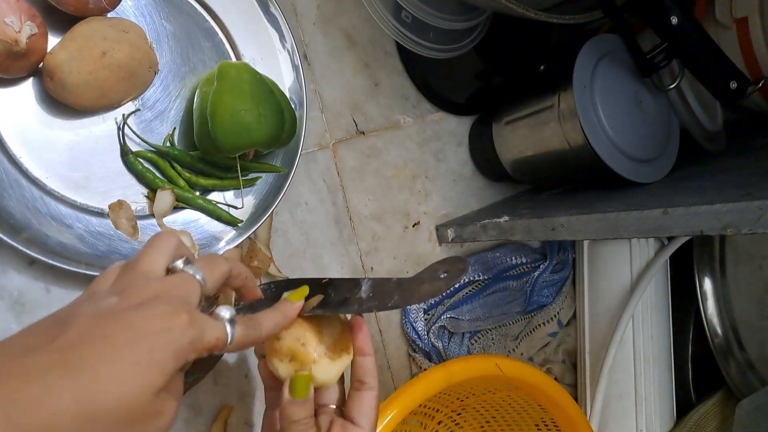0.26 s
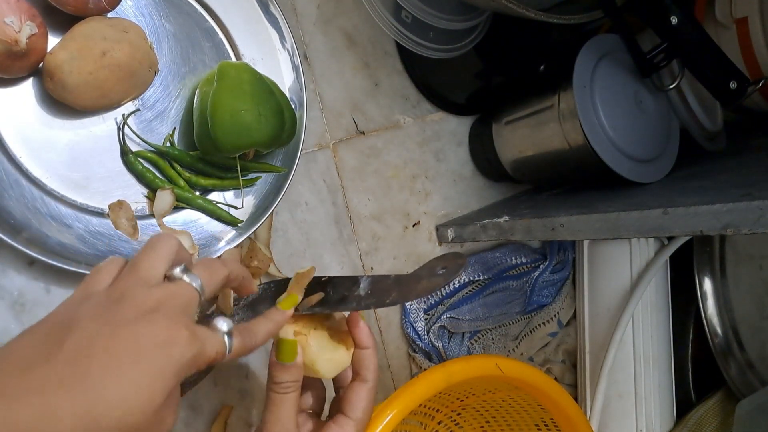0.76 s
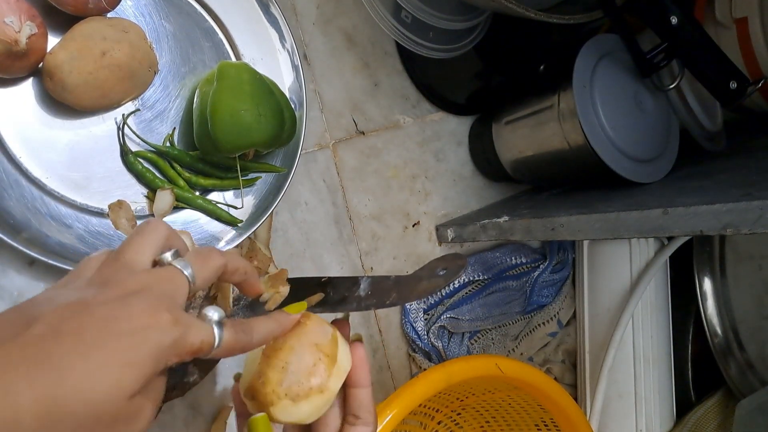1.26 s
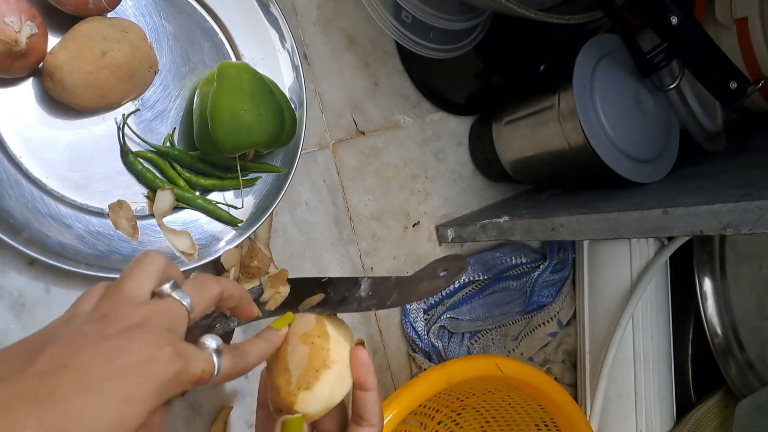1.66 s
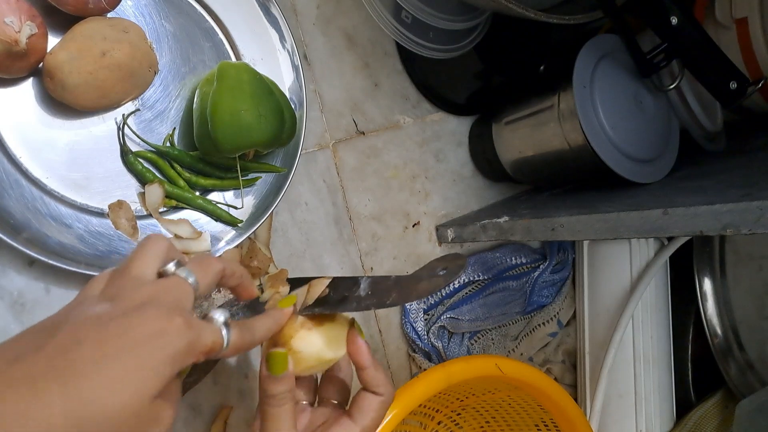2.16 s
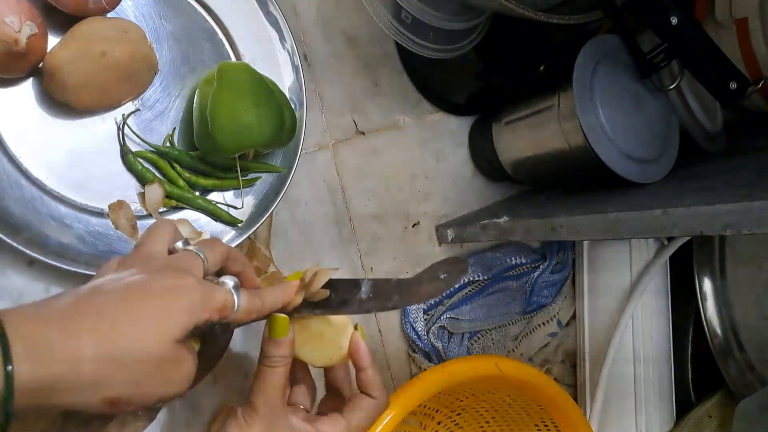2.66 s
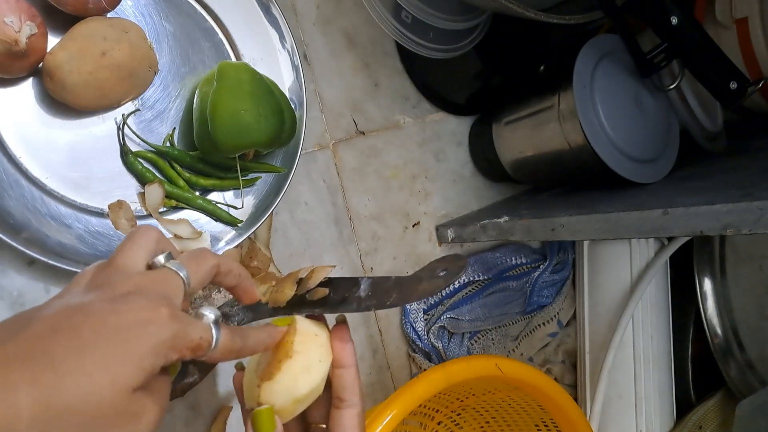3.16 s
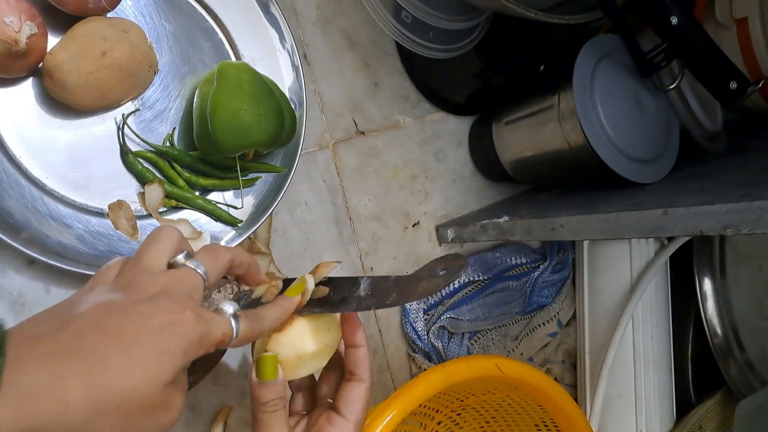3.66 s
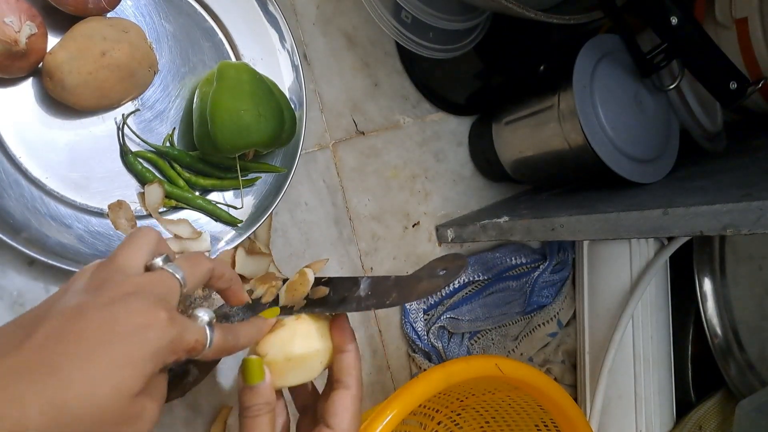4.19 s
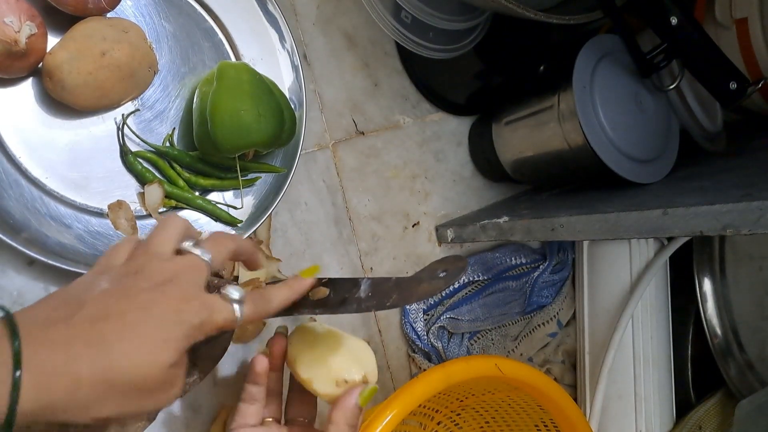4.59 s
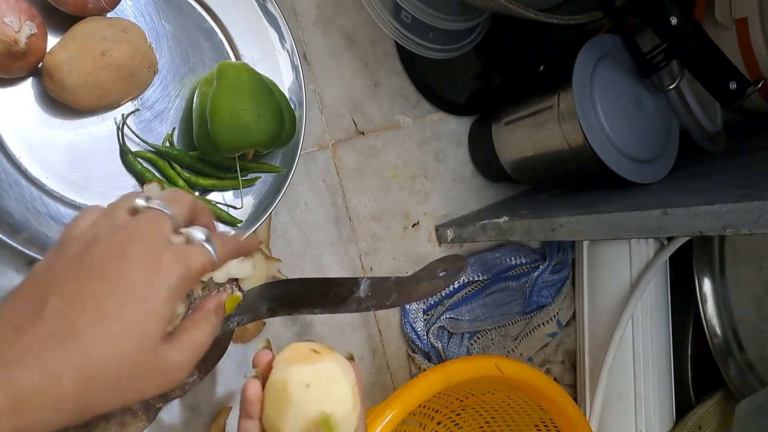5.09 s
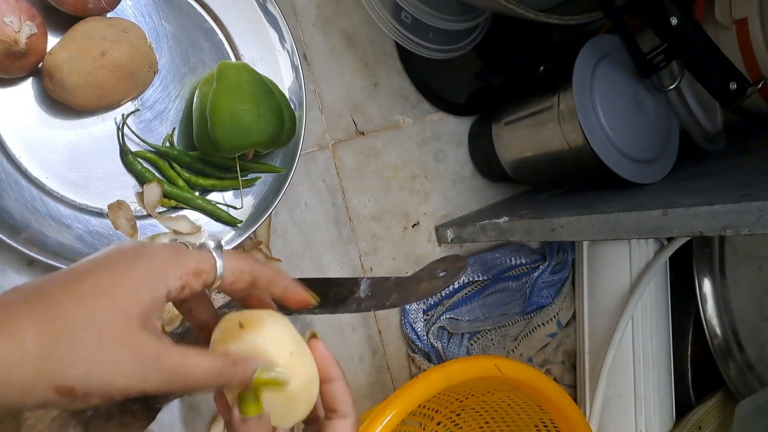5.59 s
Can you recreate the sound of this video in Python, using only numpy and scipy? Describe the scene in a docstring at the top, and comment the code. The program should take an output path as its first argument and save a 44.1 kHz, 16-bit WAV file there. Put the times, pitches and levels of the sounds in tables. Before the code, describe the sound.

Thin metal bangles clink and jingle brightly over short wet rasps as a potato is peeled on a fixed blade in a small tiled kitchen.

```python
"""A potato is pushed in short strokes against a fixed upright blade in a small tiled kitchen.
Peel rasps and bangles clink from the start, hard near 0.9 s, in a dense flurry at 2.0-2.9 s, then sparsely.
Hard clinks return at 3.8-5.1 s, a soft rush peaks at 4.5 s, and the end is faint, over a low wavering hum.
Bangles are noise snaps, noise chatter and decaying modes; the rasp is random bursts through resonances.
The room is decaying noise convolved with the near sounds; the hum is a sine, the rush filtered noise."""
import sys
import numpy as np
from scipy import signal
from scipy.fft import rfft, irfft, next_fast_len
from scipy.io import wavfile
from scipy.ndimage import uniform_filter1d, map_coordinates

SR = 44100
rng = np.random.default_rng(int(sys.argv[2]) if len(sys.argv) > 2 else 0)


def wrap_up_sound(samples):
    """Save the sound to the file named by the first command line argument, as 16-bit audio."""
    columns = np.atleast_2d(samples).T
    # keep every value between -1 and 1, then stretch to whole-number steps
    tamed = np.clip(columns, -1, 1)
    steps = np.round(tamed * 32767).astype(np.int16)
    wavfile.write(sys.argv[1], SR, steps)


N = 257396

# Wrist jolts that throw the bangles together; levels before the trims in scene() and the ring offsets:
# (time [s], snap level [dB], chatter level [dB], chatter length [s], ring level [dB])
JOLTS = [(0.002, -48, -45.5, 0.094, -48), (0.087, -36, -34, .024, -47), (0.163, -26, -37, 0.018, -41),
         (0.208, -33, -42, 0.042, -37), (0.24, -28, -27.5, 0.014, -42), (0.3513, -45, -36.5, 0.036, -41),
         (0.381, -38, -31, 0.014, -46), (0.512, -39, -40.5, .012, -42), (0.601, -44, -52, 0.067, -54),
         (0.743, -46, -41.5, 0.044, -59), (0.8612, -22, -37, 0.027, -45), (0.897, -21, -42, 0.086, -44),
         (1.013, -31, -25.5, 0.035, -38), (1.106, -29.5, -40, .025, -49), (1.157, -28, -44, 0.017, -43),
         (1.204, -34, -41.5, 0.012, -44), (1.269, -42, -53, 0.0093, -49.5), (1.379, -37.5, -58, .016, -52),
         (1.434, -28, -42, 0.023, -55), (1.4674, -45, -31.5, 0.029, -34), (1.77, -43, -40.5, 0.043, -44.5),
         (1.968, -30, -42, 0.023, -54), (2.028, -42, -51, .038, -47), (2.117, -40, -41.5, 0.052, -43),
         (2.144, -29, -29, .021, -31.5), (2.2514, -34, -28, 0.028, -46), (2.3, -35, -30.5, 0.054, -36.5),
         (2.3785, -15, -18.5, .026, -30), (2.403, -15.5, -28, .028, -28.5),
         (2.47, -28, -26.5, 0.045, -36.5), (2.524, -36, -33, 0.027, -36), (2.594, -13.5, -29.5, 0.014, -48),
         (2.643, -55, -43, .033, -37.5), (2.675, -48, -33.5, .014, -59), (2.715, -28, -25, .04, -39),
         (2.8055, -38, -37.5, .05, -39.5), (2.907, -36, -38.5, 0.04, -46), (2.932, -31, -47, .025, -44),
         (3.014, -49, -43, .019, -50), (3.0491, -51, -50, 0.013, -51), (3.168, -46, -43, .018, -55),
         (3.178, -47, -40, 0.014, -45), (3.413, -50, -51.5, 0.031, -53), (3.623, -48, -38.5, 0.041, -53),
         (3.7966, -21.5, -32.5, .024, -40.5), (3.914, -54, -48, 0.063, -50), (3.978, -33, -45, .07, -52),
         (4.022, -31, -34, 0.028, -57), (4.0613, -19.5, -32, .021, -39), (4.087, -33, -32, 0.052, -44),
         (4.185, -42, -40, 0.022, -52), (4.198, -25, -37, .03, -50), (4.215, -40, -31, 0.014, -57),
         (4.2404, -14.5, -50, .015, -52), (4.277, -44, -35.5, .035, -50), (4.371, -33, -33.5, 0.044, -49),
         (4.461, -46, -41.5, 0.056, -45), (4.549, -46, -52.5, 0.11, -43.5), (4.696, -50, -43, 0.028, -47),
         (4.721, -22, -30.5, .012, -40.5), (4.744, -26, -49, .019, -51), (4.903, -51, -45.5, .067, -57),
         (4.958, -29, -25.5, 0.024, -38), (5.055, -16.5, -23.5, .011, -48), (5.135, -34, -43, 0.043, -48),
         (5.21, -34, -28.5, 0.012, -44), (5.244, -48, -42.5, 0.042, -45.5), (5.3503, -34, -37, .017, -37.5),
         (5.445, -50, -46.5, 0.025, -49.5), (5.537, -46, -50, 0.022, -57), (5.6284, -41, -45, .012, -47),
         (5.681, -51, -42.5, 0.038, -48.5), (5.787, -51, -41, 0.046, -56)]
# Ring modes of a bangle, t60 before ring_scale: (frequency [Hz], relative level [dB], t60 [s])
BANGLE_MODES = [(4188, -5, .12), (4330, -6, .05), (4629, -5, .06), (5017, -7, .08), (5450, -7, .04),
                (5722, -3, .12), (5846, -2, .11), (6976, -7, .09), (7536, -10, .1), (7719, -2, .16),
                (8053, -4, .13), (8100, -6, .11), (9571, -3, .16), (9829, 0, .17), (11229, -4, .12),
                (11830, -5, .12), (12035, 0, .19), (12349, -6, .12), (12965, -1, .17), (13813, -1, .17),
                (14050, -4, .17), (14728, -6, .16), (15420, -5, .12), (15585, -4, .15)]
# Spectrum of the contact: (frequency [Hz], relative density [dB per Hz])
SNAP_SPECTRUM = [(700, -50), (2000, -27), (3200, -19.5), (4300, -19.5), (6500, -7.5), (9000, -12),
                 (11000, -1), (12300, 5), (13500, -5.5), (16000, -2)]
# Spectrum of the chatter after it: (frequency [Hz], relative density [dB per Hz])
CHATTER_SPECTRUM = [(1000, -52), (3200, -20), (4200, -19.5), (6200, -15), (7200, -9.5), (9500, -14),
                    (11200, -3.5), (12100, 2.5), (12700, -2.5), (13900, 6.5), (14400, -22), (15600, 1.5)]
# Hard taps of a finger ring on the blade, damped at once: (time [s], pitch [Hz], level [dB])
DAMPED_TAPS = [(0.862, 4260, -45), (0.9, 4230, -41), (1.037, 4100, -39), (1.437, 5680, -36),
               (1.44, 4480, -41.5), (2.381, 4270, -34), (2.396, 4600, -37), (2.425, 4130, -39),
               (3.7964, 4160, -54), (4.243, 4210, -34.5), (4.723, 4320, -41.5), (5.056, 4290, -29.5),
               (5.0875, 5760, -39), (5.353, 4580, -40)]
# Cutting strokes: (start [s], push length [s], release time constant [s], rasp level at end of push [dB])
CUTS = [(0.02, 0.017, 0.026, -54.5), (0.153, .11, 0.039, -45.5), (0.6, 0.07, 0.027, -43.5),
        (0.883, 0.016, 0.017, -50), (1.784, 0.11, 0.017, -46), (2.052, .018, 0.029, -49),
        (2.109, 0.05, 0.047, -44), (2.187, 0.027, .03, -48), (2.343, .058, .018, -43),
        (2.638, .014, 0.02, -60), (2.793, 0.014, 0.029, -47), (2.93, 0.017, 0.041, -53.5),
        (3.276, .14, 0.048, -54.5), (3.467, 0.13, .022, -49.5), (3.966, 0.017, 0.014, -44.5),
        (4.091, 0.017, 0.028, -53.5), (4.248, 0.08, 0.097, -45.5), (4.706, 0.017, 0.0085, -46)]
# Resonances of the blade held against the potato: (frequency [Hz], width [Hz], relative level [dB])
BLADE_MODES = [(917, 25, -14), (1416, 36, 1.5), (1491, 38, 0.5), (1547, 45, 0.5), (1812, 116, -6),
               (2093, 89, -2), (2267, 99, -2), (2384, 88, -3.5), (2750, 95, -10.5)]
# Colour of the fine tearing of the skin: (frequency [Hz], relative density [dB per Hz])
TEAR_SPECTRUM = [(200, -6), (1000, -4), (2300, -11), (3200, -5), (5000, -3.5), (9000, -11), (16000, 1)]
# Dull knocks of the hands on the blade's base: (time [s], level [dB])
BASE_KNOCKS = [(.9, -54), (2.385, -49), (2.797, -43), (2.816, -50.5), (2.834, -50), (4.724, -52),
               (5.058, -56)]
# Resonances of the base: (frequency [Hz], width [Hz], relative level [dB])
BASE_MODES = [(200, 47, -8), (440, 51, -6), (490, 75, 2.5), (632, 59, -8.5), (1510, 74, -5.5)]
# Decay of the room: (frequency [Hz], t60 [s])
WALL_T60 = [(300, 0.1), (2000, 0.37), (8000, 0.25), (16000, 0.28)]
# Low hum, before its trim and waver: (time [s], relative level [dB])
HUM_LEVEL = [(0, -53.5), (0.65, -50), (1.2, -59), (1.5, -54.5), (2.42, -49.5), (2.7, -59), (3.1, -57),
             (3.75, -52), (5.0, -55), (5.84, -59.5)]
# Soft rush, before its random flutter: (time [s], level [dB])
RUSH_LEVEL = [(0, -59.5), (1.6, -66.5), (2.6, -58), (3.3, -55), (3.7, -64), (4.15, -58.5), (4.5, -46.5),
              (4.75, -56), (5.2, -59.5), (5.84, -74)]
# Colour of the rush: (frequency [Hz], relative density [dB per Hz])
RUSH_SPECTRUM = [(150, -7), (500, 4), (1000, -1), (2100, -1.5), (3200, -5.5), (4800, -4), (8000, -12.5),
                 (16000, -10)]
# Colour of the room tone: (frequency [Hz], relative density [dB per Hz])
TONE_SPECTRUM = [(15, -11), (28, -10), (45, 2), (75, -1.5), (150, -3), (270, -8.5), (500, -6), (620, -12.5),
                 (780, -20), (1400, -18.5), (2300, -27), (3200, -51), (4500, -34), (8000, -35.5)]
# Left-right likeness of the room tone: (frequency [Hz], correlation [-1 to 1])
TONE_LIKENESS = [(60, 0.78), (150, 0.93), (280, 0.78), (550, 0.58), (1500, 0), (5000, 0)]
# Faint steady resonances of the room: (frequency [Hz], width [Hz], relative level [dB])
DRONE_MODES = [(203, 18, 1.5), (411.8, 12, 1), (501.4, 13.4, -2.5)]
# Balance of the two ports: (frequency [Hz], left minus right [dB])
PORT_BALANCE = [(60, 3), (130, -1), (800, 2.5), (2000, 1.5), (4500, -1), (6200, -2), (7300, 3.5),
                (8500, 4.5), (9700, 0), (11000, -3.5), (13000, -1.5), (14500, -7.5), (15700, -7)]

SWING_DB = 1.5  # left-right scatter from jolt to jolt
USUAL_SNAP_DB, SNAP_HALVES_DB = -32, 26  # snap t60 halves for each 26 dB over the usual
LOW_RING_DB, MIDDLE_RING_DB = -3, -2.2  # re ring level of the jolt
TOP_RING_DB = 0.2  # re chatter level of the jolt
STIRS_PER_S, STIR_LENGTH_S = 4.0, 0.019
STIR_SNAP_DB, STIR_CHATTER_DB, STIR_RING_DB, STIR_SPREAD_DB = -55, -50.5, -60, 3
BITE_S, PUSH_SWELL_DB = 0.012, 9
HUM_WAVER_DB, HUM_WAVERS_PER_S = 4.5, 7.0
TOP_HZ = 15780


def amp(db):
    """Decibels to gain."""
    return 10 ** (np.asarray(db) / 20)


def unit(x):
    """Scale to rms 1."""
    return x / np.sqrt(np.mean(x ** 2) + 1e-20)


def along(points, hz):
    """Interpolate (frequency [Hz], value) points on a log axis."""
    f, v = np.transpose(points)
    return np.interp(np.log(hz + 1), np.log(f + 1), v)


def level(rows):
    """(time [s], level [dB]) points to one gain per sample, silent outside them."""
    s, db = np.transpose(rows)
    return amp(np.interp(np.arange(N) / SR, s, db, left=-120, right=-120))


def wobble(knots_per_s, size=N):
    """Smooth random curve through normally distributed knots."""
    knots = rng.standard_normal(int(size * knots_per_s / SR) + 4)
    return map_coordinates(knots, [np.arange(size) * knots_per_s / SR])


def filtered(x, response):
    """Multiply the spectrum of x by a response of frequency."""
    m = next_fast_len(N + SR // 4)
    spectrum = rfft(x, m) * response(np.fft.rfftfreq(m, 1 / SR))
    return irfft(spectrum, m)[..., :N]


def coloured(x, spectrum):
    """Filter x by a table of dB, then scale to rms 1."""
    return unit(filtered(x, lambda hz: amp(along(spectrum, hz))))


def body(modes):
    """Causal response of resonances with alternating sign."""
    def response(hz):
        total = 0
        for k, (centre, width, db) in enumerate(modes):
            damping = 1j * hz * width
            total = total + (-1) ** k * amp(db) * damping / (centre * centre - hz * hz + damping)
        return total
    return response


def pair(alike):
    """White stereo noise with the given left-right correlation."""
    share = np.clip(alike, 0, 1)
    a = rng.standard_normal((3, N))
    return np.sqrt(share) * a[2] + np.sqrt(1 - share) * a[:2]


def add(track, s, sound):
    """Mix a sound in at time s."""
    start = max(round(s * SR), 0)
    part = track[..., start:start + sound.shape[-1]]
    part += sound[..., :part.shape[-1]]


def bangles(snap_trim_db, chatter_trim_db, snap_t60_s):
    """Each contact snaps, sets the neighbouring bangles chattering and leaves them ringing."""
    t = np.arange(SR // 5) / SR
    waves = stack(t, detune=0.01205, ring_scale=0.79, count=4)
    # chatter: a swarm of tiny collisions, about a millisecond each
    collisions = amp(3.5 * np.clip(wobble(700), -2, 2))
    patches = dict(bins=4, frames=8)
    shaking = collisions * patchy(pair(0.064), depth_db=5.5, **patches)
    swarm = steady(coloured(resonant(shaking, lift_db=3.5, width_hz=39), CHATTER_SPECTRUM))
    crack = steady(coloured(patchy(pair(0.089), depth_db=4, **patches), SNAP_SPECTRUM))
    snap_gain, chatter_gain, rings = np.zeros((3, 2, N))
    for s, snap_db, chatter_db, length_s, ring_db in JOLTS + stirs(count=40):
        place = amp(SWING_DB * rng.standard_normal() * np.array([[1], [-1]]) / 2)
        # a harder contact is briefer
        t60_s = snap_t60_s * 2 ** ((USUAL_SNAP_DB - snap_db) / SNAP_HALVES_DB)
        snap = np.exp(-np.log(1000) * t / t60_s)
        chatter = np.exp(-(t / length_s) ** 2) * (1 - np.exp(-t / 0.0029))
        group_db = [ring_db + LOW_RING_DB, ring_db + MIDDLE_RING_DB, chatter_db + TOP_RING_DB]
        add(snap_gain, s, place * amp(snap_db) * snap)
        add(chatter_gain, s, place * amp(chatter_db) * chatter)
        add(rings, s, place * clink(waves, group_db, length_s, scatter_db=9.0, follow_db=-8.0))
    snaps = amp(snap_trim_db) * snap_gain * crack
    chatters = amp(chatter_trim_db) * chatter_gain * swarm
    return snaps + chatters + rings


def stirs(count):
    """Faint contacts at chance times, as rows like those of the jolts."""
    gap, strength = rng.exponential(size=count), rng.standard_normal(count)
    rows = zip(np.cumsum(gap) / STIRS_PER_S, STIR_SPREAD_DB * strength)
    return [(s, STIR_SNAP_DB + db, STIR_CHATTER_DB + db, STIR_LENGTH_S, STIR_RING_DB + db)
            for s, db in rows if s < N / SR]


def stack(t, detune, ring_scale, count):
    """Free vibration of every mode of every bangle; no two bangles are quite alike."""
    hz, _, t60 = np.transpose(BANGLE_MODES)
    apart = np.linspace(0, 1, count)[:, None] * detune * rng.standard_normal((count, len(hz)))
    rate = 2j * np.pi * hz * (1 + apart) - np.log(1000) / (t60 * ring_scale)
    waves = np.exp(rate[..., None] * t)
    return (waves * (1 - np.exp(-t / 0.0011))).astype(np.complex64)


def clink(waves, group_db, length_s, scatter_db, follow_db):
    """One bangle rings and knocks its neighbours in turn; each mode's phase differs between the ports."""
    hz, db, _ = np.transpose(BANGLE_MODES)
    group = np.digitize(hz, [6500, 10500])  # low, middle, top
    count = len(waves)
    follower = np.minimum(np.arange(count), 1)[:, None, None]
    shared_db = scatter_db * rng.standard_normal(len(hz))
    own_db = 2 * rng.standard_normal((count, 2, len(hz)))
    size = amp(db + follow_db * follower + shared_db + own_db)
    # each group of modes is brought to its own level
    power = np.bincount(group, np.mean(np.sum(size ** 2, axis=0), axis=0)) / 2
    size = size * (amp(group_db) / np.sqrt(power))[group]
    size = size * np.exp(2j * np.pi * rng.random(size.shape))
    sound = np.zeros((2, waves.shape[-1]))
    for k, ring in enumerate((size.astype(np.complex64) @ waves).real):
        add(sound, length_s * k / count * rng.uniform(.6, 1.8), ring)
    return sound


def resonant(x, lift_db, width_hz):
    """Forced shaking comes out strongest near the bangles' own modes."""
    mode_hz = np.transpose(BANGLE_MODES)[0]
    grid = np.linspace(0, SR / 2, num=2048)
    nearness = np.max(1 / (1 + ((grid[:, None] - mode_hz) / width_hz) ** 2), axis=1)
    return filtered(x, lambda hz: amp(lift_db * np.interp(hz, grid, nearness)))


def patchy(x, depth_db, bins, frames):
    """Each instant favours other patches of frequency, as other bangles take part."""
    z = signal.stft(x, nperseg=512)[2]
    field = rng.standard_normal(z.shape[1:])
    for _ in range(2):
        field = uniform_filter1d(uniform_filter1d(field, bins, 0), frames, 1)
    gain = amp(depth_db * np.clip(unit(field), -2, 2))
    return signal.istft(z * gain, nperseg=512)[1][:, :N]


def steady(x):
    """Even out the loudness of a noise, keeping its colour and fine grain."""
    power = uniform_filter1d(np.mean(x ** 2, axis=0), size=500)
    return x / np.sqrt(np.abs(power) + 1e-12)


def taps(t60_s, spread):
    """A tap sounds one short cluster of neighbouring modes."""
    t = np.arange(SR // 12) / SR
    envelope = np.exp(-np.log(1000) * t / t60_s) * (1 - np.exp(-t / 0.00016))
    track = np.zeros((2, N))
    for s, hz, db in DAMPED_TAPS:
        modes = hz * (1 + spread * np.array([0, -1, 1]))
        phase = 2 * np.pi * rng.random((3, 1)) + 0.8 * rng.standard_normal((2, 3, 1))
        ring = np.array([1, .35, .35]) @ np.sin(2 * np.pi * modes[:, None] * t + phase)
        add(track, s, amp(db) * ring * envelope)
    return track


def peel(breaks_per_s, tear_db, rasp_db):
    """Cells burst one after another at the edge; the tiny jolts sound through the blade."""
    bursts = (rng.random(N) < breaks_per_s / SR) * pair(0.32)
    bursts = bursts * amp(1.84 * np.clip(wobble(170), -2, 2))  # the edge catches and slips
    rasp = amp(rasp_db) * unit(filtered(bursts, body(BLADE_MODES)))
    tear = amp(tear_db) * coloured(bursts, TEAR_SPECTRUM)
    return stroke_force() * (rasp + tear)


def stroke_force():
    """Every stroke bites in, swells while the hand pushes, and dies away as the peel parts."""
    t = np.arange(SR) / SR
    bite = np.minimum(t / BITE_S, 1)
    force = np.zeros(N)
    for s, push_s, release_s, db in CUTS:
        swell = amp(PUSH_SWELL_DB * (np.minimum(t / push_s, 1) - 1))
        release = np.exp(-np.maximum(t - push_s, 0) / release_s)
        add(force, s, amp(db) * bite * swell * release)
    return force


def knocks(t60_s):
    """Soft bumps that die quickly in the base of the blade."""
    t = np.arange(SR // 4) / SR
    bump = np.exp(-np.log(1000) * t / t60_s) * (1 - np.exp(-t / 0.00067))
    push = np.zeros(N)
    for s, db in BASE_KNOCKS:
        add(push, s, amp(db) * bump)
    return push * unit(filtered(pair(0.93), body(BASE_MODES)))


def room(x):
    """The tiles answer at once, each frequency dying at its own speed."""
    hz, t, z = signal.stft(rng.standard_normal((2, SR // 2)), SR, nperseg=256)
    decay = np.exp(-np.log(1000) * t / along(WALL_T60, hz)[:, None])
    tail = signal.istft(z * decay, SR, nperseg=256)[1]
    tail = tail * (1 - np.exp(-np.arange(tail.shape[1]) / SR / 0.00077))
    return signal.fftconvolve(x, tail / np.linalg.norm(tail[0]), axes=1)[:, :N]


def background(tone_db, hum_trim_db, hum_hz, drone_db, air_db):
    """Noise room tone and drone, a sine hum wavering in level and phase, faint air and the rush."""
    def tone_response(hz):
        # mid and side shares that give the left-right likeness
        turn = np.arccos(np.clip(along(TONE_LIKENESS, hz), -1, 1)) / 2
        return amp(along(TONE_SPECTRUM, hz)) * [np.cos(turn), np.sin(turn)]

    mid, side = filtered(pair(0), tone_response)
    tone = amp(tone_db) * unit(np.array([mid + side, mid - side]))
    drone = amp(drone_db) * unit(filtered(pair(0.87), body(DRONE_MODES)))
    waver = amp(HUM_WAVER_DB * np.clip(wobble(HUM_WAVERS_PER_S), -2, 1))
    hum_phase = 2 * np.pi * hum_hz * np.arange(N) / SR + 1.54 * wobble(9)
    hum = amp(hum_trim_db) * level(HUM_LEVEL) * waver * np.sqrt(2) * np.sin(hum_phase)
    rush = level(RUSH_LEVEL) * amp(wobble(12)) * coloured(pair(0.24), RUSH_SPECTRUM)
    return tone + drone + hum + rush + amp(air_db) * pair(0.028)


def scene():
    """Bangles, blade and hands close by, with the room's answer and the background."""
    jingle = taps(t60_s=0.025, spread=0.05)
    jingle = jingle + bangles(snap_trim_db=-0.5, chatter_trim_db=1.5, snap_t60_s=0.031)
    # thin rings radiate no bass
    highpass = signal.butter(N=3, Wn=2200, btype="high", fs=SR, output="sos")
    jingle = signal.sosfilt(highpass, jingle)
    cutting = peel(breaks_per_s=2400, tear_db=-0.5, rasp_db=0) + knocks(t60_s=0.15)
    near = jingle + cutting
    behind = background(tone_db=-51.5, hum_trim_db=-2.1, hum_hz=59.2, drone_db=-59.0, air_db=-79)
    return near + amp(-4) * room(near) + behind


def record(dry):
    """The two ports colour the sound differently; a steep cut acts above TOP_HZ."""
    sides = np.array([[1], [-1]]) / 2

    def response(hz):
        cut = np.sqrt(1 + np.minimum(hz / TOP_HZ, 2) ** 400)
        return amp(sides * along(PORT_BALANCE, hz)) / cut

    return filtered(dry, response)


dry = scene()
out = record(dry)
wrap_up_sound(out)
```